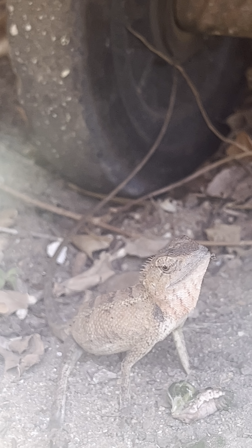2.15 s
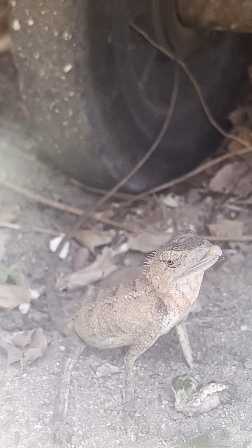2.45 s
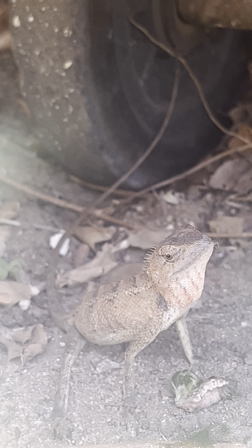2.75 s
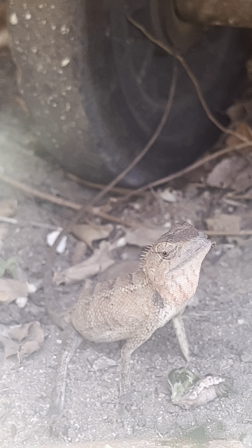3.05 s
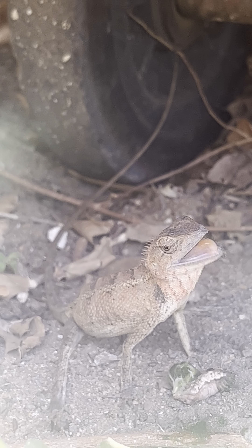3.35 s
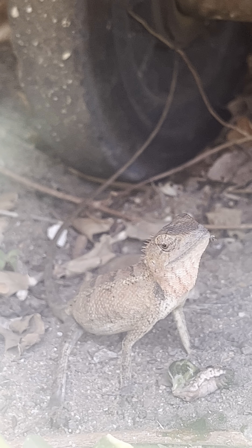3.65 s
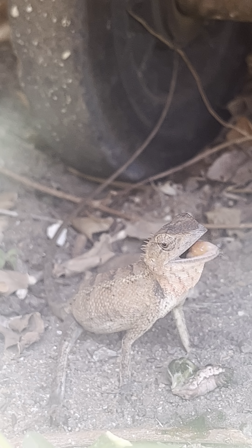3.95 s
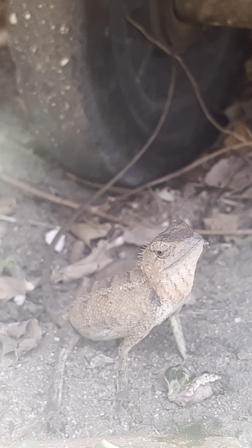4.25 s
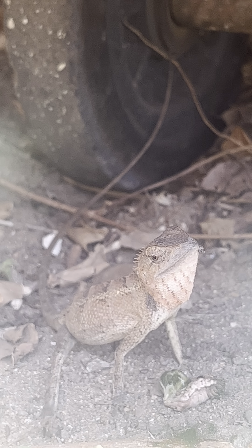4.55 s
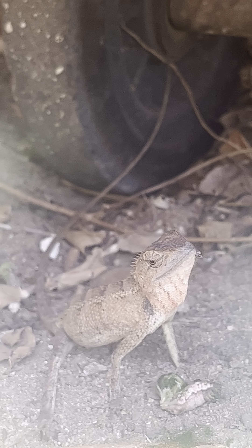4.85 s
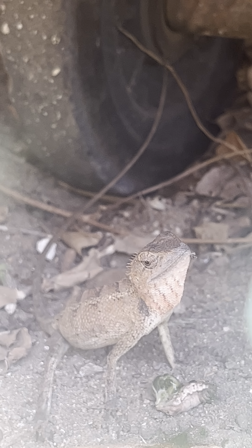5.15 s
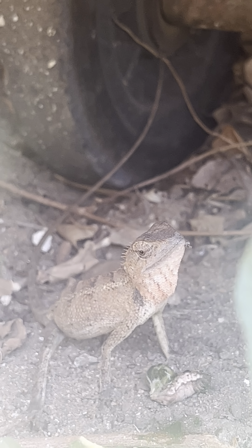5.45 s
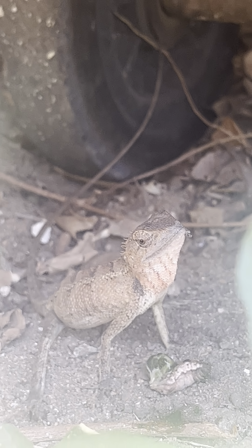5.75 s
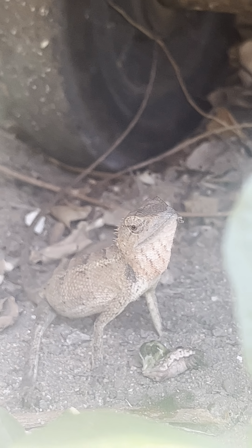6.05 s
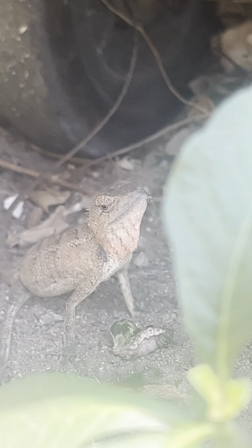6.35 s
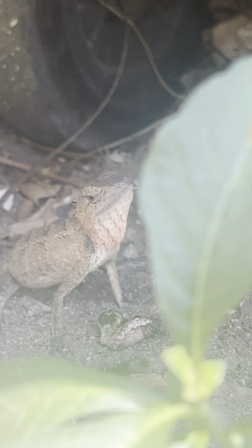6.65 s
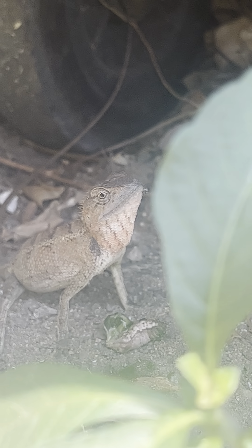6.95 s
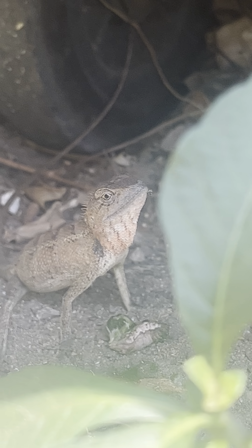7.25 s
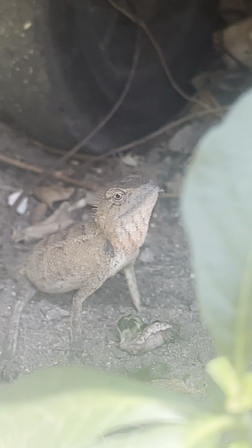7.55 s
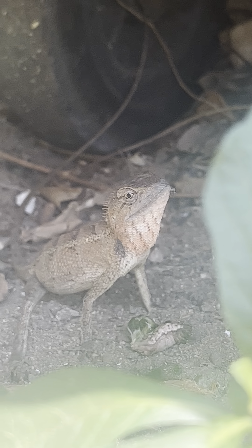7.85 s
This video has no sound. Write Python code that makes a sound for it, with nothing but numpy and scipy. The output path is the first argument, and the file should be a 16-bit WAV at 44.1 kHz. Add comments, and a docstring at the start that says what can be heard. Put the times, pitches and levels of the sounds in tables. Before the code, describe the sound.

In a quiet yard, a small engine putters some way off over distant traffic rumble, a low electrical hum and thin hiss. Dry twigs and leaves give a few light snaps close to the microphone, while faint bird whistles and far hoots come and go. The engine eases off, then slowly speeds up as the traffic grows slightly louder. A distant horn sounds once on the left, and leaves rustle faintly near the end.

```python
"""A quiet yard. A short click at the very start; some way off a small single-cylinder engine putters,
each firing ringing its silencer, over far traffic, mains hum and a thin hiss with a narrow ring in it.
Then dry leaves and twigs snap close by; faint bird calls and far hoots come and go from about 1 s. The
engine eases off after 2 s, then slowly pulls away as the traffic draws nearer. A far horn sounds on the
left at 5.3 s, and leaves rustle near the end. Two microphone ports pick it all up."""
import sys
import numpy as np
from scipy import signal
from scipy.fft import rfft, irfft
from scipy.io import wavfile
from scipy.ndimage import uniform_filter1d, map_coordinates

SR = 44100
rng = np.random.default_rng(int(sys.argv[2]) if len(sys.argv) > 2 else 0)


def dump(signal):
    """Clip the signal to [-1, 1] and save it as 16-bit WAV at the path in sys.argv[1]."""
    limited = np.clip(np.atleast_2d(signal).T, -1, 1)
    pcm = np.round(limited * 32767).astype(np.int16)
    wavfile.write(sys.argv[1], SR, pcm)


N = 348390
TIME = np.arange(N) / SR
FREQ = np.maximum(np.arange(N // 2 + 1) * SR / N, 1)


def engine(near_db, pipe_hz=145, pipe_width_hz=60, jitter_rad=.015, scatter_rad=.2, lag_s=7e-5):
    """Each firing thumps and rings the silencer: 14 harmonics of the firing rate."""
    # firing rate: t/s, f/Hz
    speed = [(0, 26.3), (.3, 26.65), (.75, 26.45), (1.02, 28.2), (1.42, 28.25), (2, 26.7), (2.3, 23.6),
             (2.6, 23.1), (3.05, 23.2), (3.4, 24.3), (4.05, 25.25), (4.95, 26.45), (5.25, 27.35),
             (5.55, 27.8), (6.2, 29.35), (6.8, 30.6), (7.03, 31.75), (7.25, 32), (7.45, 32.8), (7.9, 33.7)]
    # bass thump, order 2: t/s, level/dB
    thump = [(0, -64), (.4, -48.5), (1, -53.5), (1.25, -48), (2.3, -53), (2.7, -63), (3.5, -63), (3.9, -52),
             (4.5, -47.5), (4.95, -50.5), (5.4, -49), (5.72, -54), (6.65, -46), (6.95, -55), (7.55, -45.5),
             (7.9, -50.5)]
    # drone, order 5: t/s, level/dB
    drone = [(0, -55.5), (.9, -58), (1.15, -55.5), (1.45, -74), (1.7, -49), (1.9, -49), (2.1, -58.5),
             (2.9, -57.5), (3.25, -62.5), (3.85, -56.5), (4.5, -50.5), (4.98, -51), (5.17, -42),
             (5.4, -50.5), (5.72, -51), (5.9, -47), (6.4, -47.5), (6.92, -43.5), (7.25, -46), (7.45, -50),
             (7.9, -51)]
    # silencer resonances, the same at every speed: f/Hz, base level/dB
    silencer = [(85, -56), (112, -52.5), (119, -66.5), (126, -53.5), (136, -51), (158, -54.5), (178, -60),
                (205, -67)]
    # swell of the silencer's ring, orders 4 and 6: t/s, gain/dB
    bark = [(0, -7.5), (.9, -10), (1.1, 0.5), (1.47, -16.5), (1.75, -7.5), (2.05, -4.5), (2.45, 2),
            (3.15, -8.5), (3.5, 4), (4, -1), (4.5, 1), (4.72, -7.5), (4.95, -9), (5.25, 4.5), (5.6, 5.5),
            (6, 1.5), (6.5, 3), (7.3, 4), (7.9, 5)]
    # weaker exhaust harmonics: f/Hz, base level/dB
    exhaust = [(25, -78.5), (34, -66), (70, -61), (74, -60), (78, -56.5), (86, -55.5), (92, -61.5),
               (100, -61), (165, -61), (190, -64.5), (225, -70), (255, -67.5), (310, -74), (400, -78.5),
               (700, -78)]
    firing_hz = over_time(speed)
    cycle_rad = 2 * np.pi * np.cumsum(firing_hz) / SR + jitter_rad * walk(20)
    out = 0
    for order in range(1, 15):
        hz = order * firing_hz
        # the silencer delays what lies near its resonance, so each thump rings briefly
        phase = order * cycle_rad - np.arctan(pipe_hz / pipe_width_hz * (hz / pipe_hz - pipe_hz / hz))
        if order == 2:
            db = over_time(thump)
        elif order == 5:
            db = over_time(drone)
        elif order in (4, 6):
            pulse_db = -3.5 if order == 4 else 1.26
            db = pulse_db + over_freq(silencer, hz) + over_time(bark) + 1.8 * walk(6)
        else:
            waver_db = 3.5 * min(order / 8, 1) ** 2 * walk(5)
            db = over_freq(exhaust, hz) - 4.5 + near_db + waver_db
        if order > 7:  # echoes scatter the high orders; the low ones stay in step and throb
            phase = phase + 2 * np.pi * rng.random() + scatter_rad * order * walk(5)
        out += np.sqrt(2) * undb(db) * np.cos(phase)
    out *= 1 + .14 * walk(30)  # uneven firing strength
    return np.array([out, np.interp(TIME - lag_s, TIME, out)])


def traffic(near_db):
    """Far road noise, mostly rumble, louder as it draws nearer."""
    # road spectrum: f/Hz, relative density/dB
    spectrum = [(20, -32), (36, -18.5), (48, 4.5), (70, 0), (110, 0.5), (170, -1.5), (250, -5.5),
                (400, -13), (550, -15), (750, -17), (1200, -22.5), (2400, -26), (4000, -35), (9000, -59.5)]
    return level(diffuse(spectrum, flicker_db=1.5), -55.5) * undb(near_db)


def ticks(t60_s=.02, crumble_db=-21, lag_s=7e-5):
    """A short click at the very start, then dry twigs and leaves snap: each a crack, ring and crumble."""
    # opening click, then the snaps: t/s, ring peak/dB, ring f/Hz, ring width/Hz, crack re ring/dB
    clicks = [(.013, -52, 3200, 2800, -14), (.6653, -47.5, 3200, 1400, -27), (1.4255, -54, 2100, 1500, -22),
              (1.5975, -55, 12500, 4000, -14), (2.5301, -57, 5400, 4000, -13),
              (3.301, -64, 12800, 4500, -8), (3.5066, -58, 9600, 1600, -8), (3.5112, -48, 3100, 2700, -7),
              (3.9351, -45.5, 5350, 1600, -17), (4.795, -64, 8500, 4500, -10),
              (6.165, -66, 10500, 2500, -12)]
    out = np.zeros(N)
    for start_s, db, hz, width_hz, crack_db in clicks:
        decay = (TIME >= start_s) * np.exp(-np.log(1000) * np.maximum(TIME - start_s, 0) / t60_s)
        kick = undb(crumble_db) * rng.standard_normal(N) * decay
        kick[int(start_s * SR)] += 1
        ring = resonate(kick, hz, width_hz, stages=2)
        crack = resonate(kick, hz=4500, width_hz=11000)
        out += undb(db) * (ring / abs(ring).max() + undb(crack_db) * crack / abs(crack).max())
    right = map_coordinates(out, [(TIME - lag_s) * SR])
    return np.array([out, right])


def hum():
    """Mains hum and thin electric whines, wavering slightly in level."""
    # tones: f/Hz, level/dB
    tones = [(50, -60.5), (100, -56), (200, -69.5), (3000, -90.5), (3300, -87)]
    out = np.zeros(N)
    for hz, db in tones:
        peak = np.sqrt(2) * undb(db + .76 * walk(3))
        out += peak * np.sin(2 * np.pi * (hz * TIME + rng.random()))
    return out


def horn(left_db=6.5):
    """One distant horn to the left, sagging in pitch."""
    # blast: t/s, length/s, start f/Hz, end f/Hz, base level/dB
    blast = [(5.3, 0.45, 746, 738, -64)]
    tone = far_tones(blast, warble=.0053, warble_hz=40, t60_s=.39, echo_db=-10)
    return tone * undb(left_db * np.array([[.5], [-.5]]))


def hoots():
    """Faint far-off hoots, each gliding a little."""
    # hoots: t/s, length/s, start f/Hz, end f/Hz, direct peak/dB
    notes = [(1.25, 0.5, 836, 827, -74.5), (1.5, 0.38, 272.3, 292.6, -63.5), (1.8, 0.44, 299.8, 286.6, -64),
             (2.92, 0.32, 287, 305.5, -62.5), (3.15, 0.39, 316.3, 323.6, -60.5),
             (3.17, 0.19, 692, 707, -67), (5.35, 0.71, 307.3, 318, -62), (6.1, 0.46, 289.5, 296.6, -62),
             (7.08, 0.25, 255.8, 257.7, -59.5)]
    return far_tones(notes, warble=.00792, warble_hz=27, t60_s=.27, echo_db=-10)


def bird():
    """A small bird's faint warbled whistles, more echo than direct sound."""
    # calls: t/s, length/s, start f/Hz, end f/Hz, direct peak/dB
    notes = [(.82, 0.24, 4650, 5100, -84), (3.03, .1, 5230, 5150, -82.5), (3.25, 0.2, 4100, 5150, -76.8),
             (5.81, 0.18, 4250, 5050, -84.5), (6.29, 0.14, 5450, 5250, -77),
             (6.72, .087, 6360, 6100, -81.5), (6.92, 0.07, 4600, 4480, -80), (7.02, .18, 4250, 5200, -77.3)]
    return far_tones(notes, warble=.028, warble_hz=360, t60_s=.33, echo_db=5)


def rustle():
    """Leaves brush past each other: short strokes of tiny crackles."""
    # strokes: t/s, Gaussian sigma/s, level/dB
    strokes = [(2.82, 0.055, -88), (7.42, .014, -87), (7.505, .035, -82.5), (7.67, .028, -85.5)]
    grains = rng.standard_normal(N) * undb(2.3 * np.minimum(rng.exponential(size=N), 4))
    crackle = level(resonate(grains, hz=9000, width_hz=7000, stages=2), 0)
    envelope = sum(undb(db) * bump(at_s, sigma_s) for at_s, sigma_s, db in strokes)
    return crackle * envelope * undb(3.3 * walk(150))


def hiss(near_db):
    """Thin high hiss and a narrow ring that flares; both lift a little with the traffic."""
    # hiss spectrum: f/Hz, relative density/dB
    spectrum = [(300, -26), (1000, -1), (1700, -7), (2300, -1), (3300, 3), (4100, -12.5), (5000, -3.5),
                (5800, 0), (7000, -13.5), (8500, -22.5), (10500, -20.5), (12000, -3), (13600, -15),
                (15000, -14)]
    # flares of the ring: t/s, gain/dB
    flares = [(.6, 2.5), (.85, 5.5), (1.1, -0.5), (2.75, 4.5), (3.05, 1.5), (3.68, 4.5), (4.92, 6.5),
              (5.22, 3.5), (6.2, 5), (6.83, 6)]
    flare_db = sum(db * bump(at_s, sigma_s=.04) for at_s, db in flares)
    ring = resonate(rng.standard_normal(N), hz=2041, width_hz=80, stages=2)
    ring *= undb(1.9 * walk(36) + flare_db)
    air = level(diffuse(spectrum, flicker_db=1.7), -72) * undb(.32 * near_db)
    return air + ports(level(ring, -77) * undb(.45 * near_db))


def far_tones(notes, warble, warble_hz, t60_s, echo_db):
    """Sliding, slightly unsteady tones, blurred by the yard's echoes."""
    direct = np.zeros(N)
    wobble = 1 + warble * walk(warble_hz)
    for start_s, length_s, start_hz, end_hz, db in notes:
        progress = np.clip((TIME - start_s) / length_s, 0, 1)
        hz = (start_hz + (end_hz - start_hz) * progress) * wobble
        direct += undb(db) * np.sin(np.pi * progress) * np.sin(2 * np.pi * np.cumsum(hz) / SR)
    tail = rng.standard_normal(SR // 2) * np.exp(-np.log(1000) * TIME[:SR // 2] / t60_s)
    echo = signal.fftconvolve(direct, tail / np.linalg.norm(tail))[:N]
    return direct + undb(echo_db) * echo


def diffuse(spectrum, flicker_db):
    """Noise from all around: the ports share only a part, whose octave bands flicker separately."""
    # likeness of the ports: f/Hz, shared power fraction
    likeness = [(60, 1), (150, 0.99), (280, 0.88), (600, 0.46), (1500, 0.3), (2100, 0.95), (3000, 0.8),
                (4200, 0.89), (5900, 1), (7500, 1), (12400, 1), (15000, 0.82)]
    # port balance: f/Hz, left minus right/dB
    balance = [(250, 0), (700, 3.5), (1300, 1.5), (2000, -1), (4000, -0.5)]
    octave = np.log2(FREQ / 20)
    white = rfft(rng.standard_normal(N))
    bands = (irfft(white * np.maximum(1 - abs(octave - k), 0), N) for k in range(11))
    flickering = sum(band * undb(flicker_db * walk(9)) for band in bands)
    shared = rfft(ports(flickering))
    separate = rfft(rng.standard_normal((2, N)))
    share = np.clip(over_freq(likeness, FREQ), 0, 1)
    both = np.sqrt(share) * shared + np.sqrt(1 - share) * separate
    lean_db = over_freq(balance, FREQ) * np.array([[.5], [-.5]])
    return irfft(both * undb(over_freq(spectrum, FREQ) + lean_db), N)


def ports(x):
    """Mono to stereo: above 500 Hz the two ports differ in phase, depending on pitch."""
    # port phase: f/Hz, left lead/rad
    lead = [(500, -0.2), (1000, 1.2), (1900, 0.1), (2700, 2.2), (4100, 0.7), (5000, 1.7), (5900, 3.1),
            (7000, 4.2), (8300, 6.2), (10200, 6.7), (11000, 8.3), (12400, 9.4), (13600, 9.7), (15100, 12.4)]
    turn = np.exp(.5j * over_freq(lead, FREQ) * (FREQ > 500))
    return irfft(rfft(x) * np.array([turn, turn.conj()]), N)


def resonate(x, hz, width_hz, stages=1):
    """Equal resonances in series, gain 1 at the centre."""
    return irfft(rfft(x) / (1 + 1j * hz / width_hz * (FREQ / hz - hz / FREQ)) ** stages, N)


def walk(rate_hz):
    """Smooth random wander, spread near 1."""
    hold = max(int(SR / rate_hz), 1)
    steps = np.repeat(rng.standard_normal(N // hold + 1), hold)
    return 1.3 * uniform_filter1d(uniform_filter1d(steps, hold), hold)[:N]


def bump(at_s, sigma_s):
    """Gaussian swell, peak 1."""
    return np.exp(-.5 * ((TIME - at_s) / sigma_s) ** 2)


def over_time(points):
    """Interpolate (t/s, value) points at every sample."""
    return np.interp(TIME, *np.transpose(points))


def over_freq(points, hz):
    """Interpolate (f/Hz, value) points on a log axis."""
    point_hz, value = np.transpose(points)
    return np.interp(np.log(hz), np.log(point_hz), value)


def level(x, db):
    """Scale to an rms level."""
    return x * undb(db) / np.sqrt(np.mean(x ** 2))


def undb(db):
    """Decibels to gain."""
    return 10 ** (np.asarray(db) / 20)


def scene():
    """Engine and road noise swell together over the yard's small sounds."""
    near_db = np.interp(TIME, [3.85, 5.47], [-.97, 2.5])  # the traffic draws nearer
    road = traffic(near_db)
    calls = bird() + hoots()
    far_horn = horn()
    return engine(near_db) + road + hiss(near_db) + ticks() + far_horn + ports(hum() + rustle() + calls)


def record(dry, top_hz=15750):
    """The recorder cuts the top with a steep low-pass."""
    return signal.sosfilt(signal.ellip(10, .1, 70, top_hz, fs=SR, output="sos"), dry)


dry = scene()
out = record(dry)
dump(out)
```